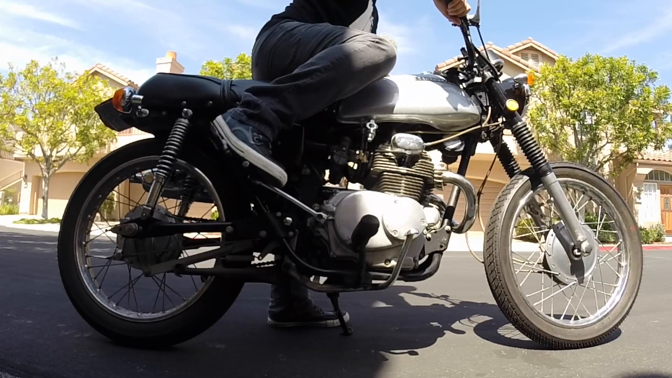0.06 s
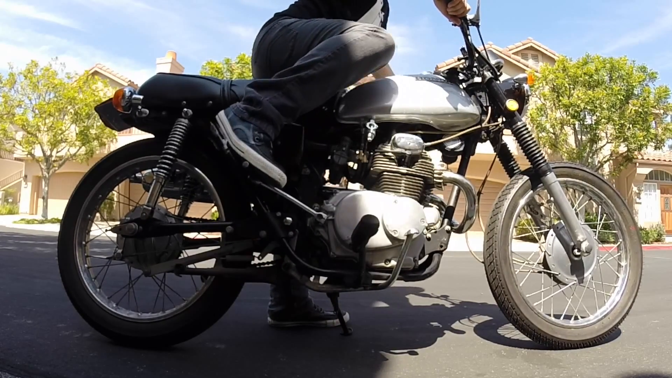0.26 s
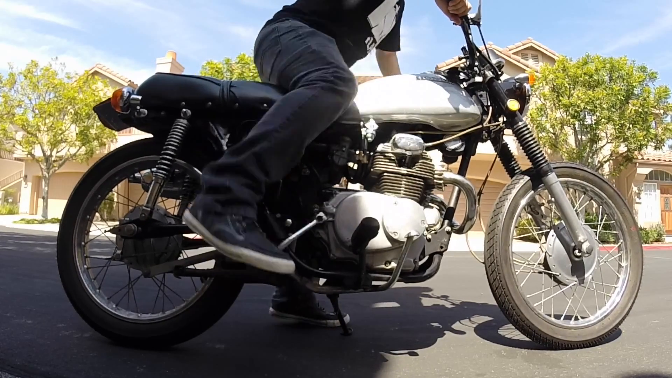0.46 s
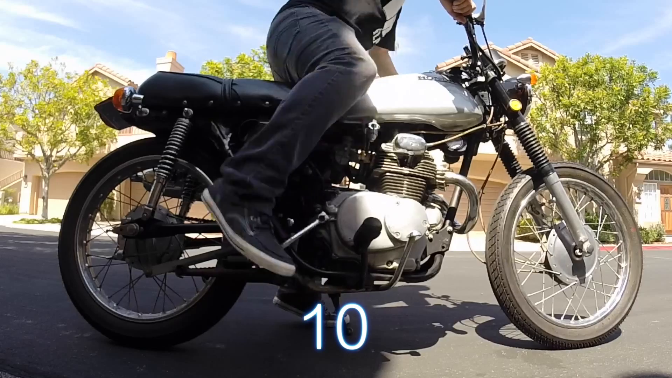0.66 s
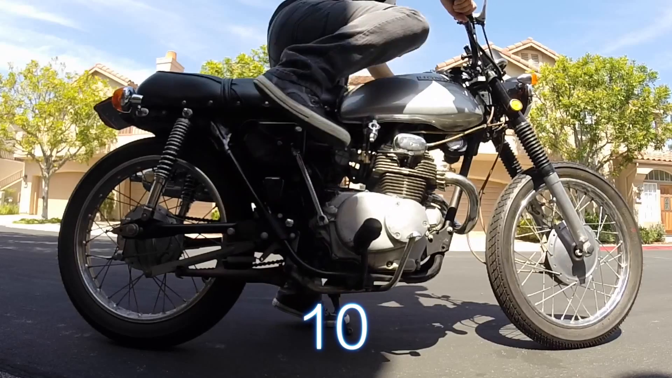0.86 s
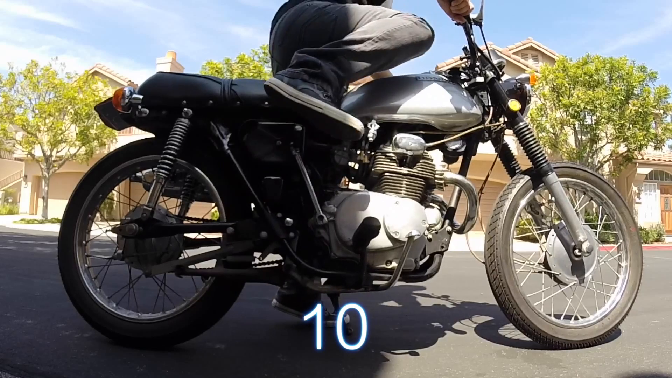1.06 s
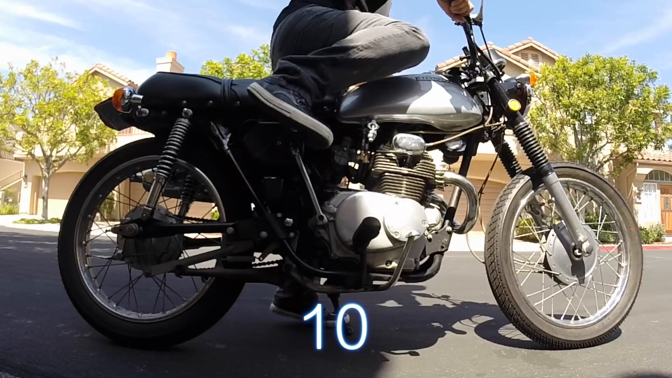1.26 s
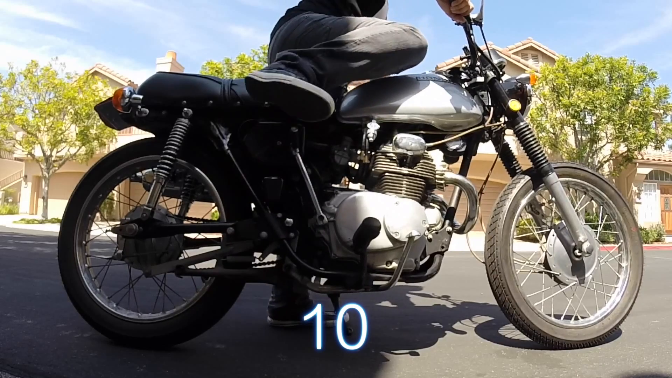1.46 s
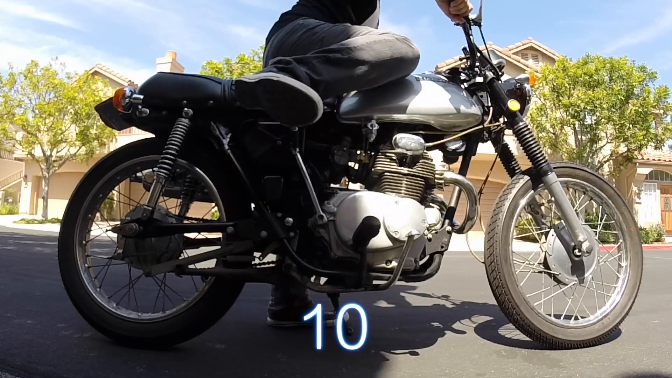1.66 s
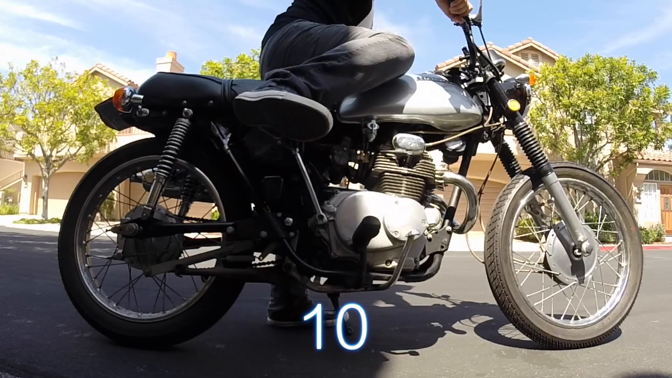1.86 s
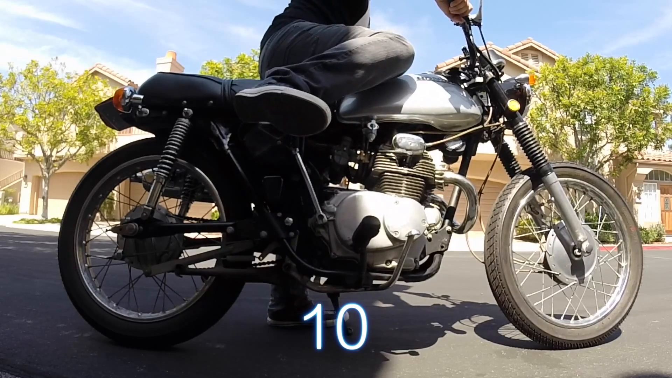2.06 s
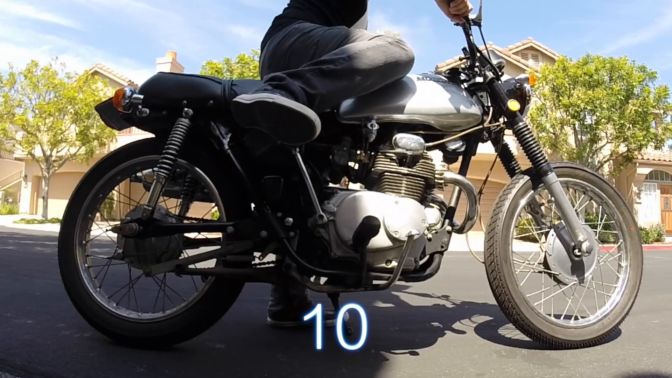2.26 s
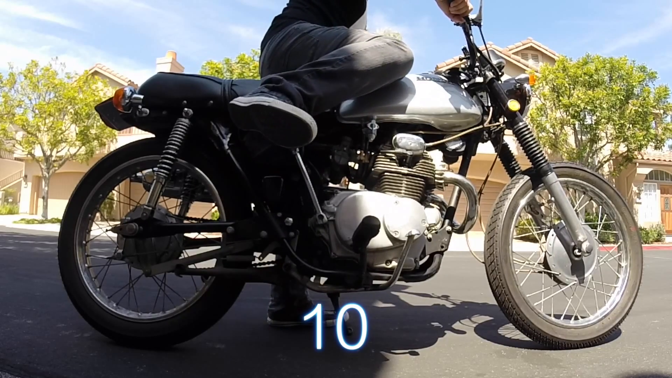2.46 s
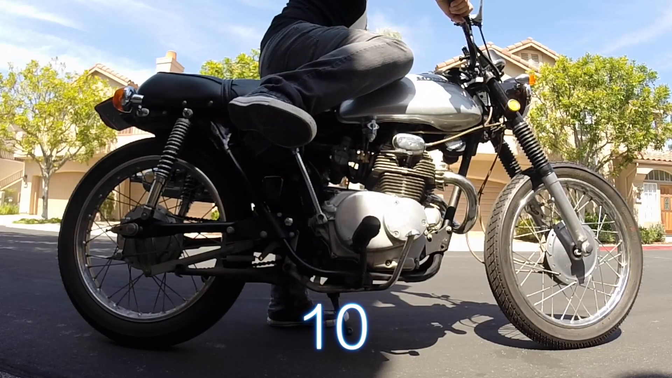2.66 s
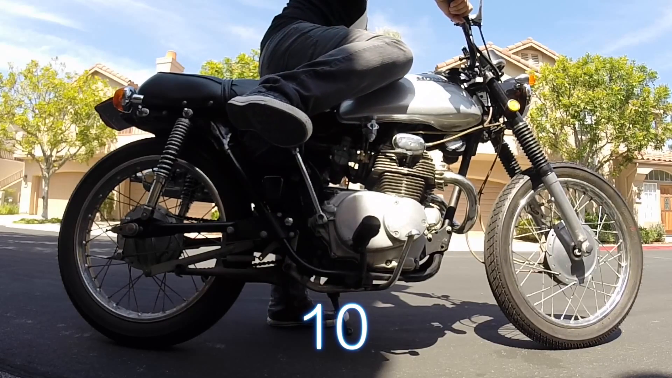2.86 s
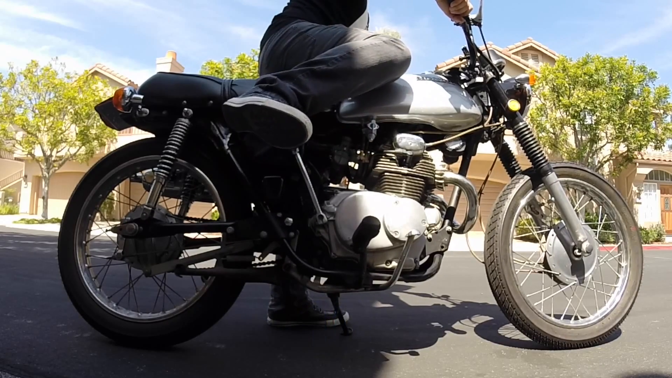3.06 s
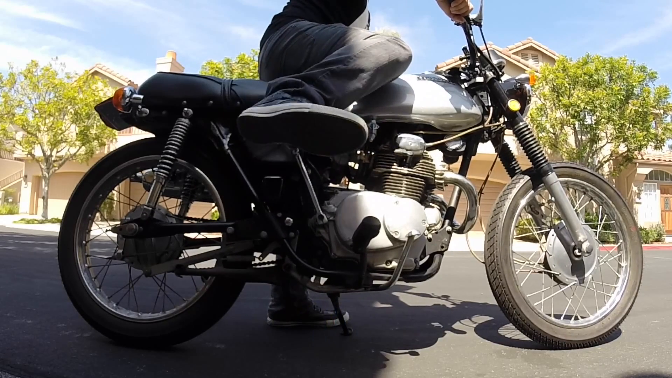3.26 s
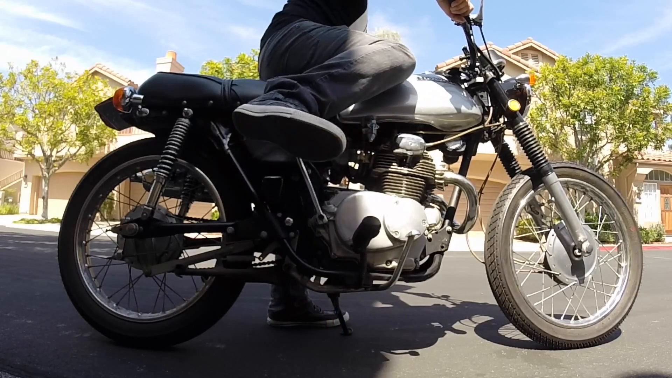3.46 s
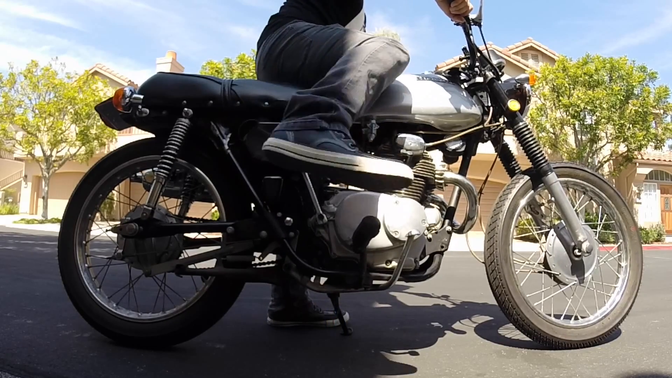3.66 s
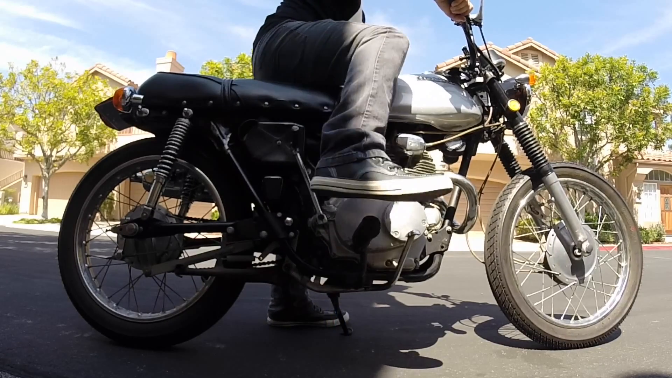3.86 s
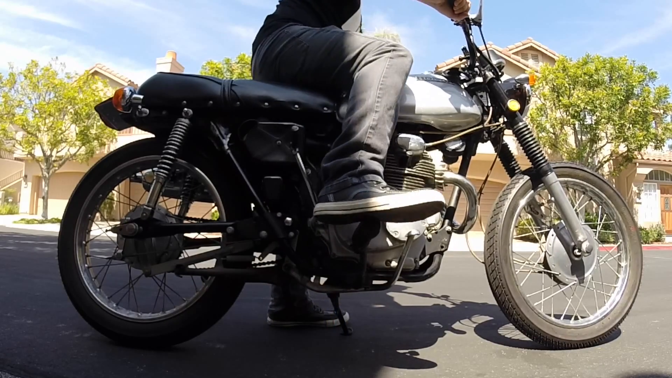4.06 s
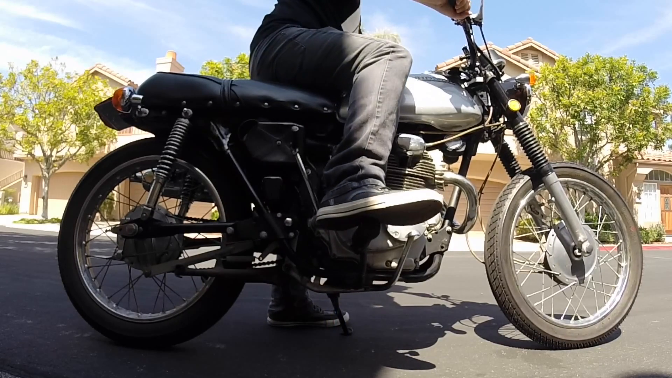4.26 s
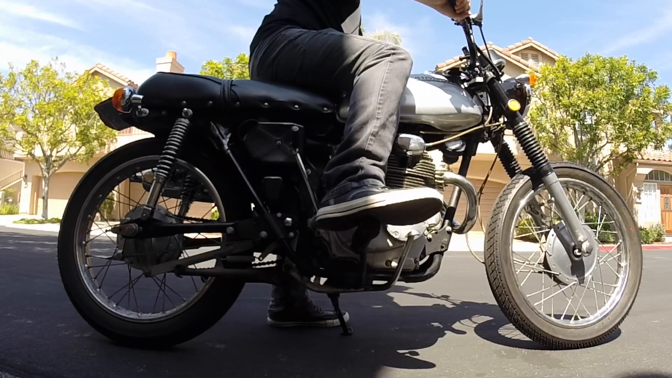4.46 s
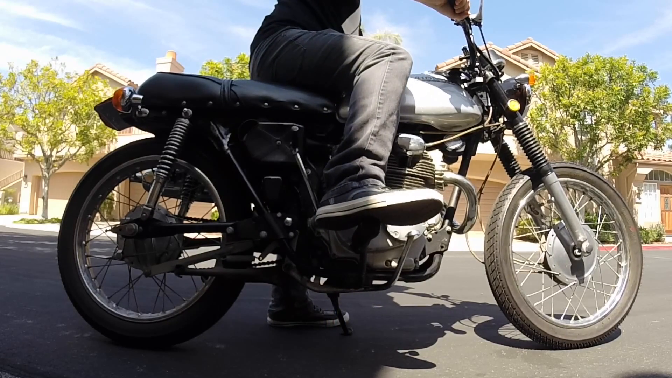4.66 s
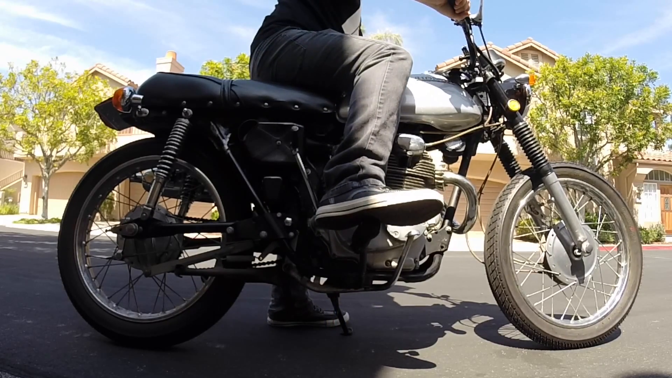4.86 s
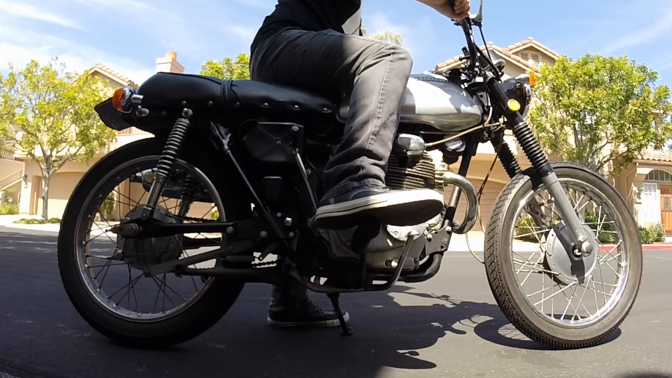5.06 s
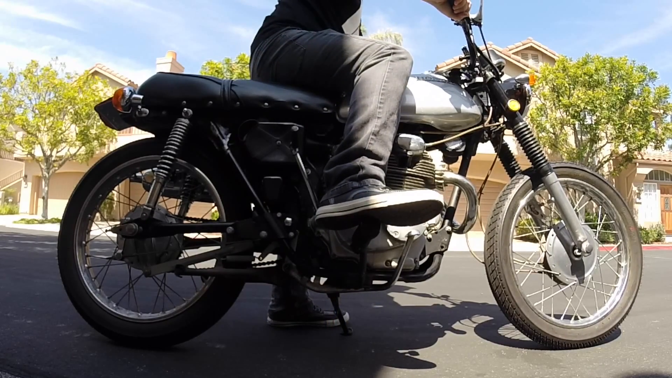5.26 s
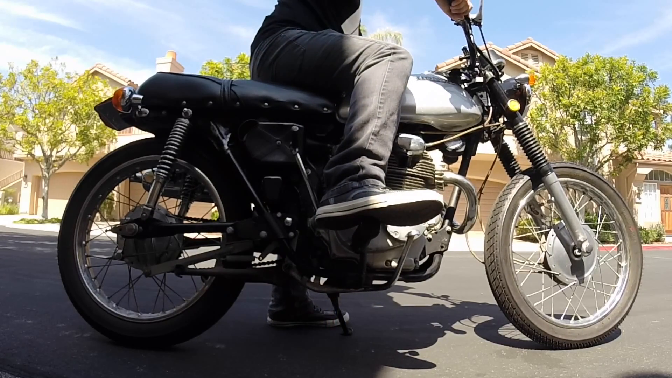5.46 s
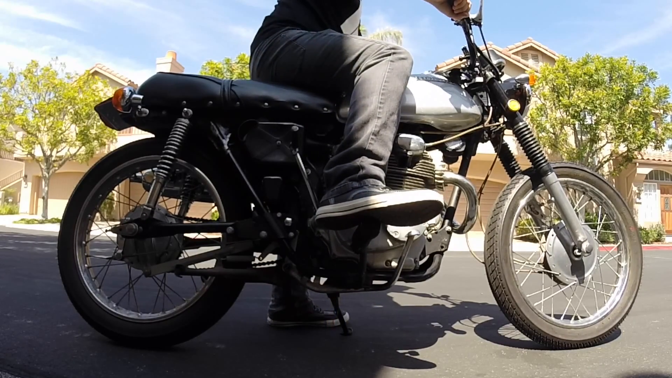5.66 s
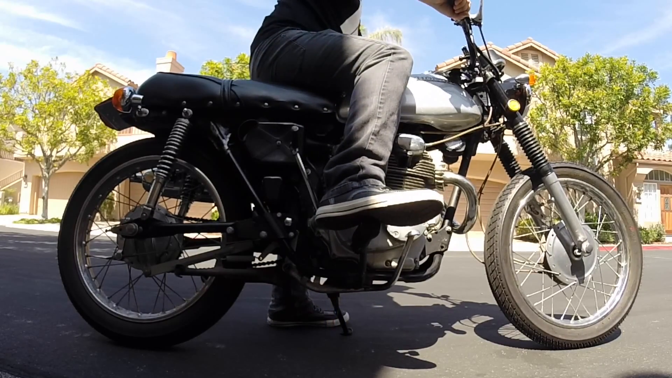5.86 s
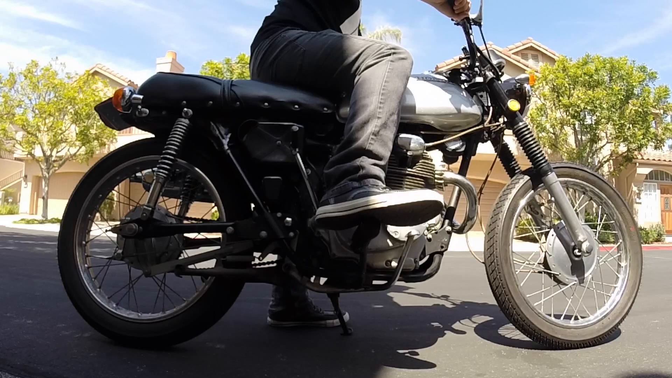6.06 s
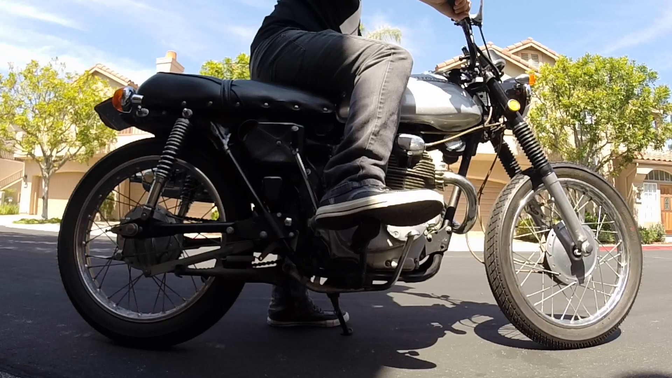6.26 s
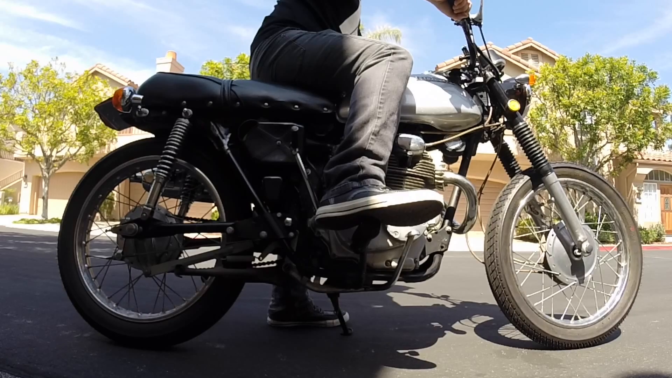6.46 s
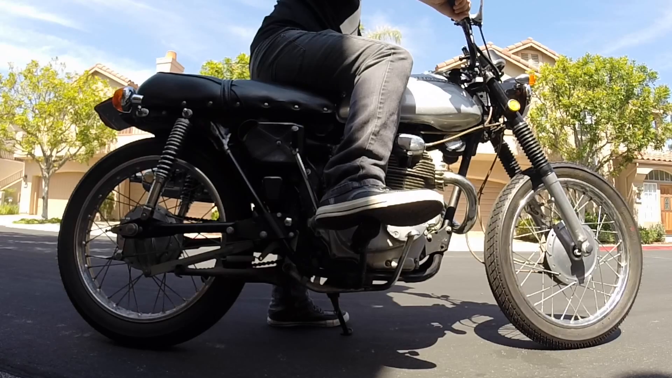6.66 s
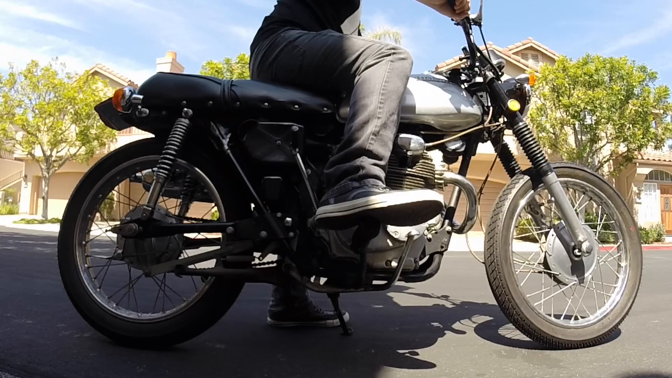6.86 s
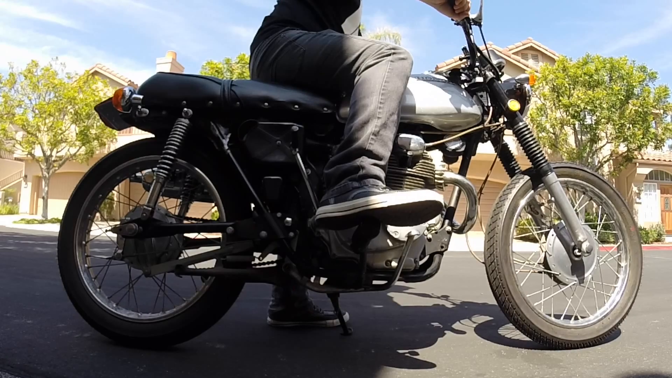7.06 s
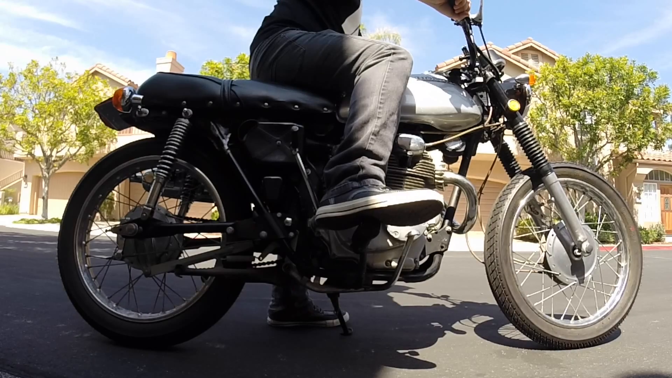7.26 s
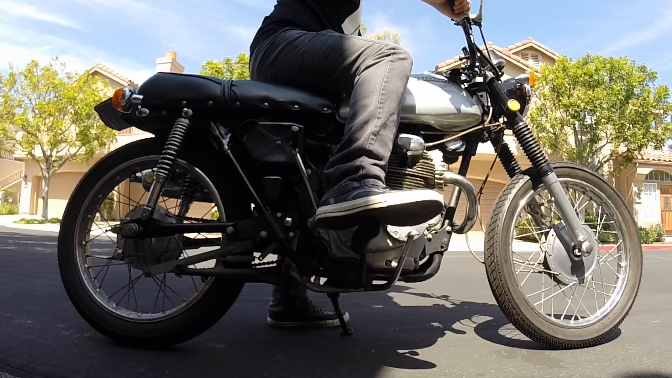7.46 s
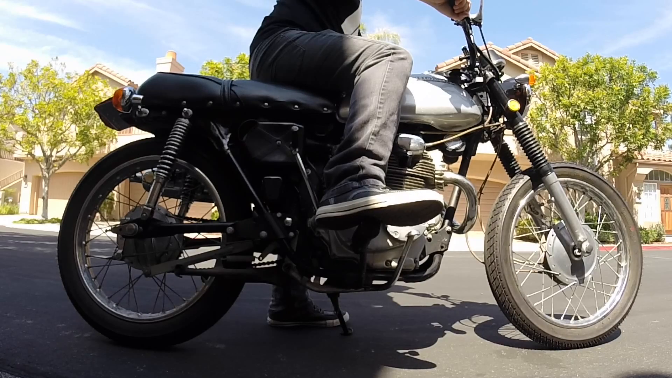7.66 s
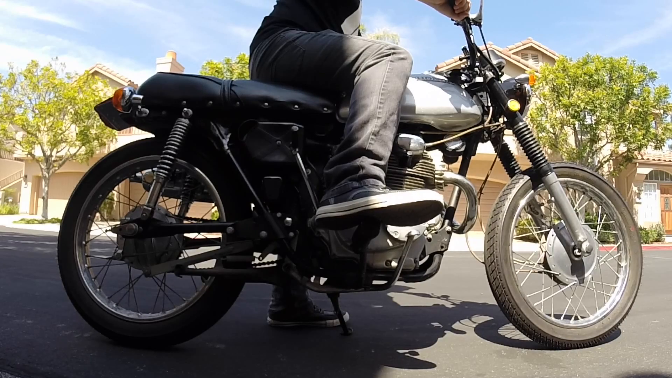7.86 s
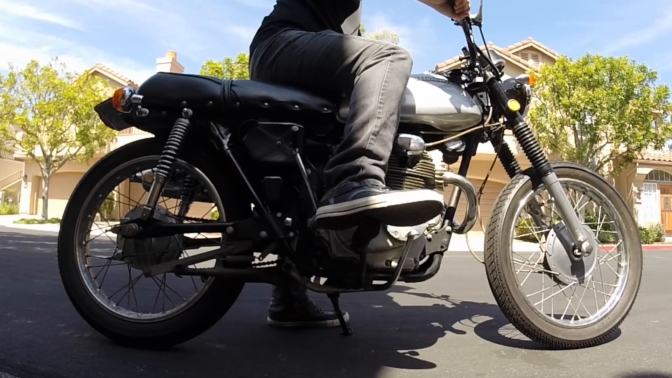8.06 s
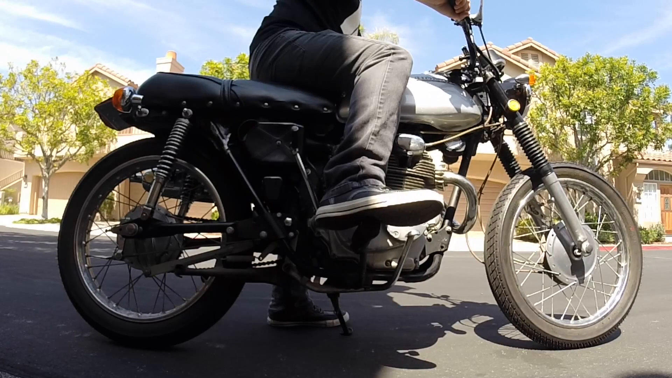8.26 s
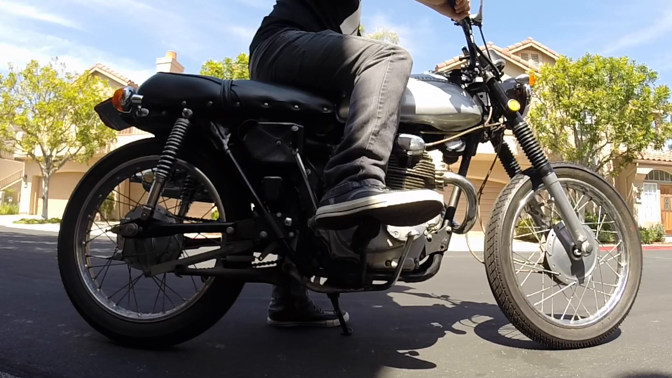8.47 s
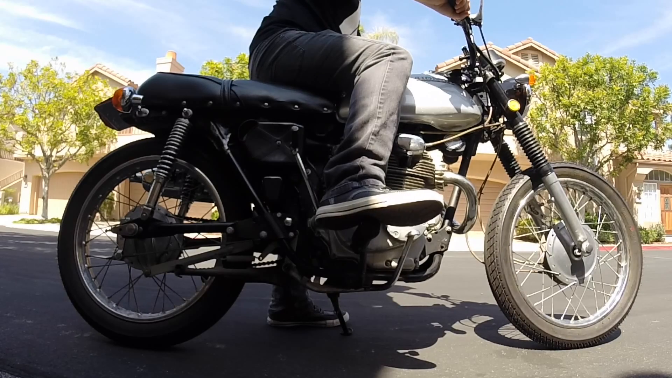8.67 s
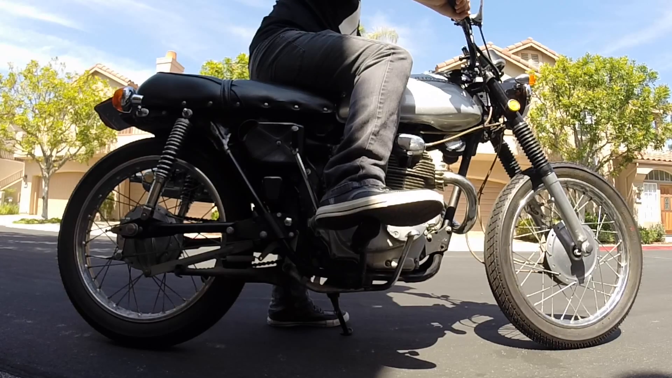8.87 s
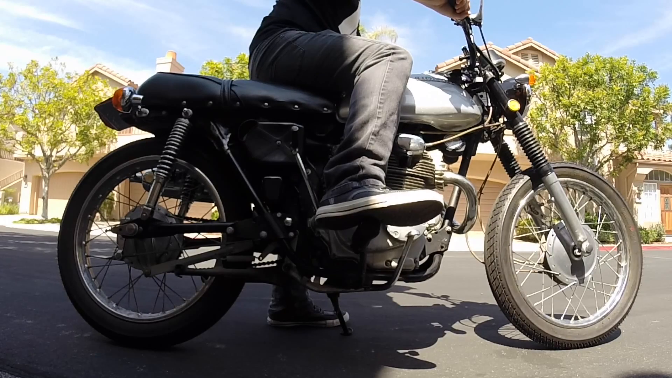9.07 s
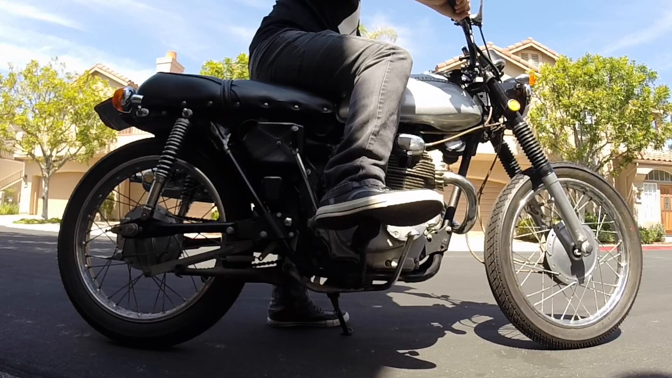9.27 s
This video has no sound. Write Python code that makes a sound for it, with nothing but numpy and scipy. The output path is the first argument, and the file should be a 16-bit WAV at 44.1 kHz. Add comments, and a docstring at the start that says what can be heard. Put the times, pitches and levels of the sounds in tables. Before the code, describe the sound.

A faint outdoor hush and low rumble open the scene. At about 0.5 seconds an old motorcycle is kicked over close by, with metal clacks and a whirr of chain and gears, and the engine catches at about 0.8 seconds. It idles with low, slightly uneven putts, ticking valves and occasional knocks. At about 4.2 seconds the throttle opens: the engine rises quickly in pitch and loudness and holds, with loose metal rattling and ringing. At 5.4 seconds it coasts down and returns to idle with a few stray pops. From about 6.8 seconds it revs again, climbing more gradually, and stays high from 7.6 seconds until the end at around 9.3 seconds. This second rev is rougher, with irregular exhaust pops, rattling and sharp metallic knocks. The exhaust has a slight echo from the quiet street.

```python
"""An old twin-cylinder motorcycle is kicked into life, idles, is revved, idles and is revved again.
Each burn sends a puff of gas down one of two exhaust pipes, which rings with a low putt. At idle the
left cylinder fires and the right one seldom catches; with the throttle open the right one takes over.
Above the putts, metal knocks and rattles, chain and gears whirr, and the valve tappets tick.
Behind it all lies the hush of a quiet street."""
import sys
import numpy as np
from scipy import signal
from scipy.fft import rfft, irfft, next_fast_len
from scipy.io import wavfile

SR = 44100
rng = np.random.default_rng(int(sys.argv[2]) if len(sys.argv) > 2 else 0)


def materialize(psi):
    """Save the field psi as 16-bit PCM at rate SR to the path in sys.argv[1].

    A 1-D psi becomes a single channel; in a 2-D psi each row is a channel.
    """
    bounded = np.clip(np.atleast_2d(psi).T, -1, 1)
    quanta = np.round(bounded * 32767).astype(np.int16)
    wavfile.write(sys.argv[1], SR, quanta)


N = 410571
TIME = np.arange(N) / SR
IDLE_RPM, FULL_RPM = 900, 2300


def exhaust(times, size, right, heat):
    """The main voice: burns puff through cool or hot pipes, and misfires gulp air back in."""
    blow, suck = np.maximum(size, 0), np.minimum(size, 0)
    cool, hot = blow * (1 - heat), blow * heat
    putts = right_pipe(times, cool * right, hot * right)
    putts += left_pipe(times, cool * ~right, pitch=1)
    putts += amp(2.5) * left_pipe(times, hot * ~right, pitch=1.2)  # hot gas rings higher and louder
    gulps = puff(ring_pipe(impulses(times, suck), RIGHT_PIPE), width_hz=290)
    throb = amp(-33) * curve(THROTTLE) * np.cos(2 * np.pi * crank_turns())  # the pistons pump once a turn
    return putts + gulps + throb + gas_rush(times, blow, heat)


# The left pipe's low notes. Each row: pitch in Hz, width in Hz (wider dies sooner), level in dB.
LEFT_PIPE = [(75, 15, -11.7), (126, 18, -9), (229, 24, -6.3)]
# Its faint higher note. The row: pitch in Hz, width in Hz, level in dB.
LEFT_OVERTONE = [(385, 14, -27.5)]
def left_pipe(times, sizes, pitch):
    """A putt and its upside-down echo from the open end; the note rises as warm gas fills the pipe."""
    strokes = impulses(times, sizes)
    end_echo = -.4 * impulses(times + .0113 / pitch, sizes)
    body = ring_pipe(strokes + end_echo, LEFT_PIPE, sag=.3, pitch=pitch)
    overtone = ring_pipe(strokes, LEFT_OVERTONE, sag=.3, pitch=pitch)
    putt = puff(body, width_hz=194 * pitch) - .78 * puff(body, width_hz=68 * pitch)
    return putt + puff(overtone, width_hz=500 * pitch)


# The right pipe's notes at idle. Each row: pitch in Hz, width in Hz, level in dB.
RIGHT_PIPE = [(86, 34, -8.5), (112, 11, -8.5), (226, 11, -17)]
# The same pipe full of hot gas. Each row: pitch in Hz, width in Hz, level in dB.
HOT_RIGHT_PIPE = [(101, 44, -1.8), (185, 40, -17), (250, 32, -8.5), (415, 50, -4.5)]
def right_pipe(times, cool_sizes, hot_sizes):
    """Puffs ring the right pipe. Its open end lets out little of the deepest bass, so that is cut."""
    cool = ring_pipe(impulses(times, cool_sizes), RIGHT_PIPE)
    hot = ring_pipe(impulses(times, hot_sizes), HOT_RIGHT_PIPE)
    cool_putts = puff(cool, width_hz=262) - 0.48 * puff(cool, width_hz=50)
    hot_putts = puff(hot, width_hz=321) - 0.85 * puff(hot, width_hz=88)
    return cool_putts + hot_putts


def ring_pipe(strokes, notes, sag=0, pitch=1):
    """Each stroke rings the pipe's notes, which start flat by the share `sag` and glide up."""
    t, glide_s = TIME[:SR // 3] * pitch, .013
    bent = t - sag * glide_s * (1 - np.exp(-t / glide_s))
    ring = sum(amp(db) * np.exp(-np.pi * width * t) * np.cos(2 * np.pi * hz * bent)
               for hz, width, db in notes)
    return signal.fftconvolve(strokes, ring)[:N]


def puff(x, width_hz):
    """Rounds each stroke into a soft push of gas by fading out what lies above width_hz."""
    return filtered(x, lambda f: np.exp(-np.abs(f / width_hz) ** 3))


def gas_rush(times, blow, heat):
    """Swirling gas trails each puff, louder when the pipe is hot."""
    gas = coloured(noise(), [(130, -3), (230, 7), (300, -1), (420, -5.5), (800, -10), (1400, -16)])
    sizes = blow * amp(4 * (heat - 0.5))
    return amp(-30.5) * gas * bursts(times + 0.0037, sizes, rise=0.0054, decay=0.014)


CATCH_S, COAST_S = .7, (5.39, 5.72)  # nothing burns before the engine catches, nor while it coasts down
WARM_RPM, HOT_RPM = 1400, 2150  # with the throttle open, the pipes heat up between these speeds
# The rider's hand. Each row: time in seconds, throttle from 0 (shut) to 1 (open).
THROTTLE = [(4.2, 0), (4.42, 1), (5.38, 1), (5.42, 0), (6.83, 0), (7.2, 1)]
# How well the left cylinder burns with the throttle open. Each row: time in seconds, share of a full burn.
LEFT_BURN = [(4.69, 1), (4.7, 0), (5.5, 0), (6.8, 1), (7.57, 1), (7.62, .2), (8.5, .25), (8.62, .5)]
# The strength of the regular burns. Each row: time in seconds, level in dB.
PUNCH = [(.78, 2.6), (4.2, -1.4), (4.38, 2.5), (5.37, 2.3), (5.78, 0), (6.8, -.5), (7.2, 2.7), (7.65, 1.4),
         (9.3, 1.4)]
# Stray pops, each taking the place of the nearest stroke. Each row: start in seconds, level in dB.
STRAY_POPS = [(0.741, -4.5), (1.991, -5.5), (3.248, -5), (5.747, -5), (5.992, -1), (6.371, -1.5),
              (7.65, -2), (7.769, -1), (7.886, -2.5), (8.004, -.7), (8.062, -1.5), (8.179, -3), (8.355, -1),
              (8.47, -2), (8.528, -0.5), (8.584, -2), (8.758, -.5), (9.039, -1), (9.093, -1), (9.256, -.5)]
def firings():
    """The cylinders take turns: gives each stroke's time, size (below 0 for a misfire), side and heat."""
    times = crank_times(0, step=1)
    rpm, throttle = curve(SPEED, times), curve(THROTTLE, times)
    right, opened = np.arange(len(times)) % 2 == 1, throttle > .1
    left_burn = np.where(opened, curve(LEFT_BURN, times), 1)
    burn = np.where(right, opened, left_burn)
    coasting = (times > COAST_S[0]) & (times < COAST_S[1])
    burn[(times < CATCH_S) | coasting] = 0
    size = np.where(burn > 0, burn * amp(curve(PUNCH, times)), -amp(-11.5))
    early_turns = 0.062 * (burn == 0) * (1 - throttle)  # at idle a gulp comes sooner than a puff
    times = times - early_turns * 60 / rpm
    pop_times, pop_db = np.transpose(STRAY_POPS)
    nearest = np.abs(times - pop_times[:, None]).argmin(axis=1)
    times[nearest], size[nearest] = pop_times, amp(pop_db)
    heat = throttle * np.clip((rpm - WARM_RPM) / (HOT_RPM - WARM_RPM), 0, 1)
    return times, size * scatter(times, spread_db=0.55), right, heat


# How fast the engine's crank spins from the kick on. Each row: time in seconds, turns per minute.
SPEED = [(0.535, 1015.6), (0.79, 788.9), (0.858, 1221.3), (1.94, 902.1), (1.972, 1021.9), (2.459, 753.8),
         (3.013, 898.3), (3.498, 873.0), (3.58, 755.8), (4.242, 866.2), (4.602, 2216.1), (5.392, 2318.0),
         (5.66, 1081.3), (6.234, 879.4), (6.28, 1014.9), (6.783, 868.5), (7.141, 1554.8), (7.599, 2023.9),
         (8.736, 2090.9), (9.31, 2255.5)]
def crank_turns():
    """How many turns the crank has made since the kick, at each sample."""
    return np.cumsum(curve(SPEED) * (TIME >= SPEED[0][0])) / 60 / SR


def crank_times(angle, step):
    """The times when the crank passes an angle (in turns), once every `step` turns."""
    turns = crank_turns()
    return np.interp(np.arange(angle, turns[-1], step), turns[turns > 0], TIME[turns > 0])


def octaves(at=TIME):
    """Engine speed in octaves above idle: 0 at idle, 1 at twice that speed."""
    return np.log2(curve(SPEED, at) / IDLE_RPM)


# How hard the loose metal shakes through the two revs. Each row: time in seconds, level in dB.
SHAKE = [(4.3, -33), (4.48, -18), (5.35, -13), (5.5, -40), (7.15, -31), (7.75, -15.5), (8.38, -15.5),
         (8.58, -25), (9.3, -21)]
# The notes of the loose metal. Each row: pitch in Hz, width in Hz, level in dB.
METAL_NOTES = [(1413, 30, 1.5), (1767, 50, -12.5), (2237, 50, -12.5), (2423, 55, -11), (2660, 45, -6.5),
               (2905, 81, -7), (3220, 45, -13), (4165, 110, -13.5), (4550, 50, -19), (5120, 48, -21.5),
               (5600, 78, -20.5)]
# The tone of metal striking metal. Each row: frequency in Hz, level in dB.
STRIKE_TONE = [(500, -12), (900, 9), (1700, -1.5), (2800, 0), (5000, -17.5), (7500, -19.5), (10500, -26),
               (14500, -43)]
def rattle(times, blow):
    """Burns in the right cylinder shake loose metal just ahead of each puff; it chatters and rings."""
    shake = (blow > 0) * amp(curve(SHAKE, times)) * scatter(times, spread_db=1)
    chatter = bursts(times - .001, shake, rise=0.0035, decay=0.01)
    chatter += amp(-30) * curve(THROTTLE) ** 2
    strikes = coloured(noise() * amp(3.9 * noise()), STRIKE_TONE)
    return amp(-11) * chatter * strikes + amp(12) * resonate(chatter * noise(), METAL_NOTES)


# The loudest metallic knocks and clacks: from the kick start, hard burns and rattling metal.
# Each row: start in seconds, level in dB.
CLACKS = [(0.504, -33), (0.518, -31), (0.547, -25), (0.646, -31), (0.683, -37), (0.7126, -24.5),
          (0.927, -23), (0.9867, -31), (1.306, -31), (2.445, -33), (2.594, -32), (2.885, -33),
          (3.0216, -29.5), (3.5726, -30), (3.634, -31), (3.878, -27), (4.021, -30), (4.088, -28),
          (4.2967, -27.5), (4.35, -20.5), (4.389, -25), (5.497, -24.5), (5.672, -28.5), (6.0266, -29.5),
          (6.284, -28.5), (6.348, -30), (6.594, -30), (6.859, -28), (6.967, -24), (7.242, -25),
          (7.276, -25), (7.697, -27), (7.954, -26), (8.183, -26), (8.387, -21), (8.681, -18.5),
          (8.758, -23), (8.79, -20.5), (9.182, -19)]
# The notes of the engine case. Each row: pitch in Hz, width in Hz, level in dB.
CASE_NOTES = [(800, 45, 6), (950, 25, -1)]
# The notes of the cooling fins. Each row: pitch in Hz, width in Hz, level in dB.
FIN_NOTES = [(1120, 50, -7), (2000, 45, -7.5), (2640, 60, -10), (3160, 40, -14), (4420, 60, -22),
             (7120, 45, -23)]
def clacks(times, blow):
    """Sharp metallic knocks ring the engine case and fins; every burn adds a softer one."""
    clack_times, clack_db = np.transpose(CLACKS)
    knock = bursts(clack_times, amp(clack_db), rise=0.0007, decay=0.009)
    burn_times = times - 0.406 * 60 / curve(SPEED, times)  # the burn comes 0.406 turns before its puff
    force = blow * amp(-34 - 8 * octaves(times)) * scatter(times, spread_db=1)
    knock += bursts(burn_times, force, rise=0.002, decay=0.02)
    strike = amp(-3) * knock * coloured(noise(), STRIKE_TONE)
    case = amp(13) * resonate(knock * noise(), CASE_NOTES)
    fins = amp(10) * resonate(knock * noise(), FIN_NOTES)
    return strike + case + fins


# The kick spins the parts up; squeezed air slows them briefly. Each row: time in seconds, level in dB.
KICK = [(.38, -33), (.46, -4), (.51, 3), (.66, 0), (.695, -6), (.72, 0.3), (2.0, -0.5)]
# The tone of the cam chain and gears. Each row: frequency in Hz, level in dB.
WHIRR_TONE = [(300, -4), (490, -12), (660, -0.5), (810, 0.5), (980, -4), (1280, -16), (1700, -29.5)]
# The tone of many tiny impacts. Each row: frequency in Hz, level in dB.
CLATTER_TONE = [(1100, -0.5), (1550, -8), (2800, -8), (3700, -17.5), (5000, -27.5), (7300, -22),
                (9000, -32), (10400, -32), (11200, -43), (14800, -53)]
# The rasp of the valve springs and chain. Each row: frequency in Hz, level in dB.
SIZZLE_TONE = [(5200, -10), (6400, -1), (7600, 0), (8700, -9), (12000, -19), (14500, -29)]
def machinery():
    """Chain and gears whirr, small impacts clatter, springs rasp; all surge each turn and grow with speed."""
    times = crank_times(0.587, step=1)
    sizes = scatter(times, spread_db=2) * IDLE_RPM / curve(SPEED, times)
    surge = bursts(times, sizes, rise=0.0015, decay=0.01)
    whirr = coloured(noise() * (1 + 1.43 * surge), WHIRR_TONE)
    impacts = noise() * amp(4.7 * noise())
    clatter = coloured(impacts * (1 + 0.97 * surge), CLATTER_TONE)
    case = unit(resonate(noise() * (1 + 1.8 * surge), CASE_NOTES + FIN_NOTES))
    sizzle = coloured(noise() * (1 + surge), SIZZLE_TONE)
    # the chain is louder while the open throttle pulls the speed up
    pull_db = 15.5 * curve(THROTTLE) * (1 - curve(SPEED) / FULL_RPM)
    speed = octaves()
    whirr_db = -33.5 + curve(KICK) + 3.5 * speed + pull_db
    clatter_db = -42.5 + 5 * speed + 0.52 * pull_db
    valves = amp(clatter_db) * clatter + amp(-60 + 7 * speed) * sizzle
    valves *= amp(curve(KICK, TIME - .05))  # the valve parts wake a moment after the chain
    return amp(whirr_db) * (amp(-.7) * whirr + amp(-4) * case) + valves


# The tone of meshing gear teeth. Each row: frequency in Hz, level in dB.
GROWL_TONE = [(300, -1.5), (390, -2.5), (500, -8.5), (680, -1.5), (800, 3), (960, -1), (1250, -10),
              (1700, -24)]
def gear_growl():
    """The same teeth and chain links meet every two turns, so their noise repeats; speed makes it louder."""
    turns, teeth = crank_turns(), rng.standard_normal(1024)
    angles = np.linspace(0, 2, len(teeth), endpoint=False)
    mesh = np.interp(turns, angles, teeth, period=2) * (turns > 0)
    return coloured(mesh, GROWL_TONE) * amp(-41.5 + 8 * octaves())


# The ticks in every two turns. Each row: crank turns after the left exhaust stroke, level in dB.
TICKS = [(0.46, 0), (.04, -16)]
# The tone of a tick. Each row: frequency in Hz, level in dB.
TICK_TONE = [(1500, 9.5), (3200, 6.5), (5000, -6.5), (6400, 4.5), (7600, 4.5), (8800, -15), (10400, -14),
             (11200, -28), (14500, -31)]
def tappets():
    """Tappets, the parts that push the valves, tick, bounce and ring; they fade as the speed rises."""
    ticks = np.zeros(N)
    for angle, db in TICKS:
        times = crank_times(angle, step=2)
        sizes = amp(-36 + db - 6 * octaves(times)) * scatter(times, spread_db=1.8)
        ticks += bursts(times, sizes, rise=0.0016, decay=0.0042)
        bounce_times = times + .011 * (.5 + rng.random(len(times)))
        ticks += bursts(bounce_times, sizes * amp(-11), rise=0.001, decay=0.005)
    steel = resonate(ticks * noise(), [(2620, 60, 6), (6540, 50, 7), (7160, 45, 5), (7550, 60, 8),
                                       (10350, 90, -4), (11950, 50, -6)])
    return ticks * coloured(noise(), TICK_TONE) + steel


def zing():
    """Steel gives a thin, high ring once a turn, louder at speed."""
    times = crank_times(0.39, step=1)
    sizes = amp(-62.5 + 8 * octaves(times)) * scatter(times, spread_db=1.5)
    ring = unit(resonate(noise(), [(10340, 230, 0)]))
    return bursts(times, sizes, rise=0.0036, decay=0.0051) * ring


def house_echo(sound):
    """House fronts scatter a little of the sound back, after a short gap."""
    t, gap_s, fade_s = TIME[:SR // 2], .025, .42
    tail = rng.standard_normal(len(t)) * amp(-60 * t / fade_s) * (t > gap_s)
    return amp(-18) * signal.fftconvolve(sound, tail / np.linalg.norm(tail))[:N]


# The tone of the quiet street. Each row: frequency in Hz, level in dB.
HUSH_TONE = [(25, 2), (210, -22), (1080, -32.5), (12000, -58.5)]
# A low rumble that swells at the start, then holds. Each row: time in seconds, level in dB.
RUMBLE = [(0, -61), (.18, -43), (.24, -36), (.31, -39), (.39, -44), (.55, -34)]
def street():
    """A faint outdoor hush with a low rumble."""
    rumble = coloured(noise(), [(22, -11), (40, -3), (150, -20.5), (300, -34)])
    return amp(-42.5) * coloured(noise(), HUSH_TONE) + amp(curve(RUMBLE)) * rumble


def amp(db):
    """Turns decibels into a multiplier."""
    return 10 ** (np.asarray(db) / 20)


def unit(x):
    """Scales a sound to an average power of 1."""
    return x / np.sqrt(np.mean(x ** 2) + 1e-20)


def noise():
    """A fresh, even hiss."""
    return rng.standard_normal(N)


def scatter(times, spread_db):
    """A random size for each time."""
    return amp(spread_db * rng.standard_normal(len(times)))


def curve(rows, at=TIME):
    """Joins (seconds, value) rows with straight lines and reads them at the given times."""
    return np.interp(at, *np.transpose(rows))


def impulses(times, sizes):
    """One spike for each time."""
    samples = np.clip(np.round(times * SR).astype(int), 0, N)
    return np.bincount(samples, sizes, N + 1)[:N]


def bursts(times, sizes, rise, decay):
    """A loudness shape that jumps up and dies away at each time; rise and decay are in seconds."""
    t = TIME[:SR // 5]
    shape = (1 - np.exp(-t / rise)) * np.exp(-t / decay)
    return signal.fftconvolve(impulses(times, sizes), shape / shape.max())[:N]


def filtered(x, response):
    """Multiplies each frequency in x by response(frequency)."""
    length = next_fast_len(N + SR)
    return irfft(rfft(x, length) * response(np.fft.rfftfreq(length, 1 / SR)), length)[:N]


def coloured(x, tone):
    """Gives x a tone of (Hz, dB) points, fading beyond both ends, and an average power of 1."""
    hz, db = np.transpose(tone)
    log_hz = np.log(np.r_[hz[0] / 2, hz, hz[-1] * 2])
    levels = np.r_[-120, db, -120]
    return unit(filtered(x, lambda f: amp(np.interp(np.log(f + 1), log_hz, levels))))


def resonate(x, notes):
    """Rings each (Hz, width, dB) note with x, filtering twice so the gaps between notes stay quiet."""
    def peak(f, hz, width):
        damping = 1.5j * f * width
        return damping / (hz * hz - f * f + damping)
    return filtered(x, lambda f: sum(amp(db) * peak(f, hz, width) ** 2 for hz, width, db in notes))


def scene():
    """The same strokes drive the pipes, the knocks and the rattle, with the street behind."""
    times, size, right, heat = firings()
    blow = np.maximum(size, 0)
    pipes = exhaust(times, size, right, heat)
    metal = rattle(times[right], blow[right]) + clacks(times, blow)
    metal += machinery() + gear_growl() + tappets() + zing()
    return (pipes + metal + house_echo(pipes) + street())[None]


def record(dry):
    """The highest peaks are rounded off and the very top of the treble is cut."""
    ceiling, top_hz = .8, 15000
    soft = dry[0] / (1 + np.abs(dry[0] / ceiling) ** 6) ** (1 / 6)
    return filtered(soft, lambda f: f < top_hz)[None]


dry = scene()
out = record(dry)
materialize(out)
```